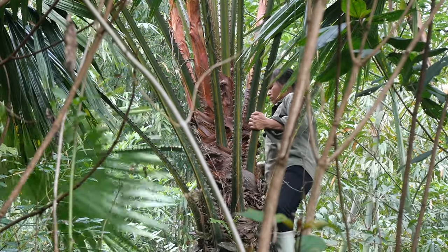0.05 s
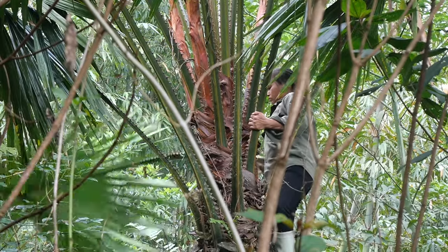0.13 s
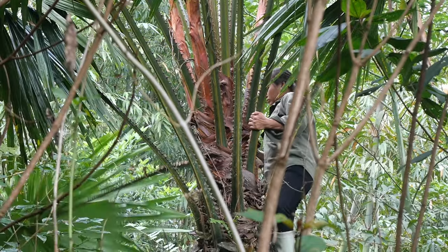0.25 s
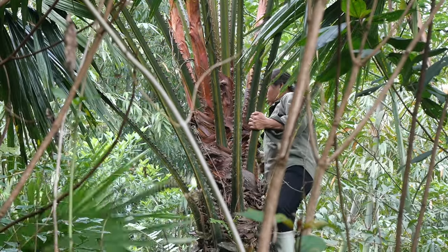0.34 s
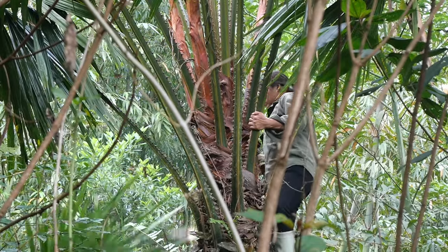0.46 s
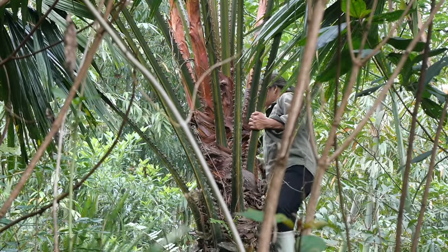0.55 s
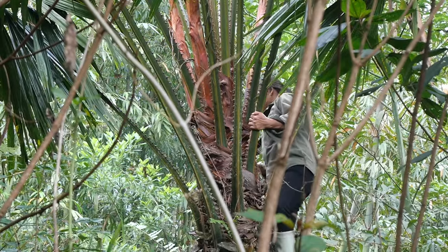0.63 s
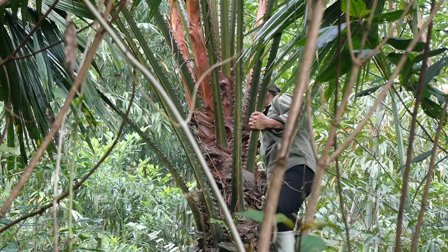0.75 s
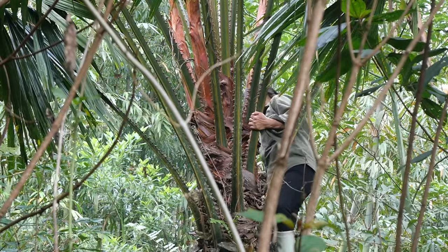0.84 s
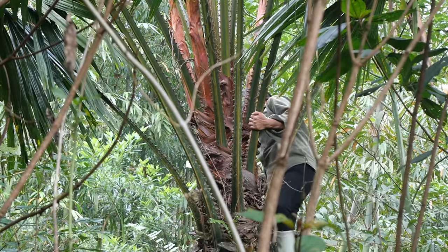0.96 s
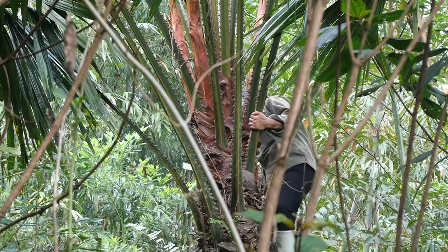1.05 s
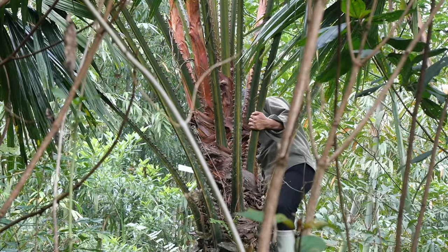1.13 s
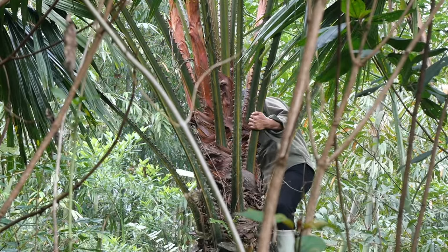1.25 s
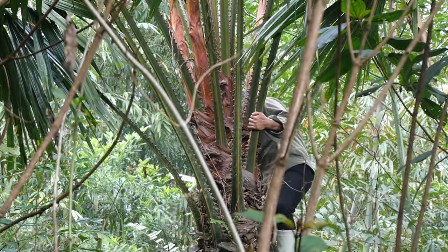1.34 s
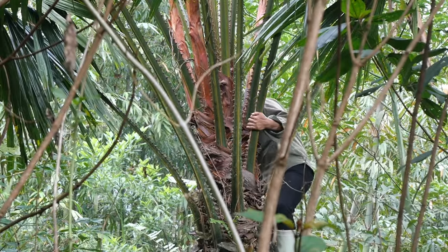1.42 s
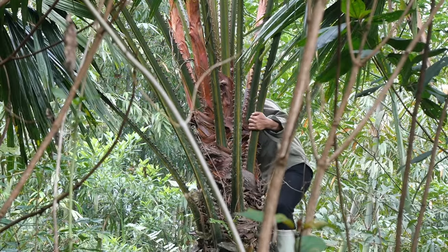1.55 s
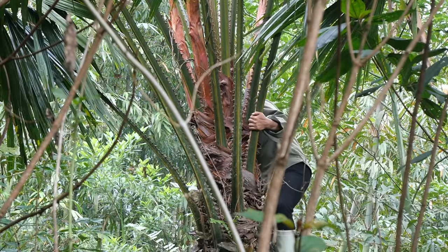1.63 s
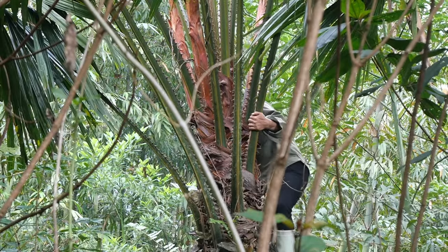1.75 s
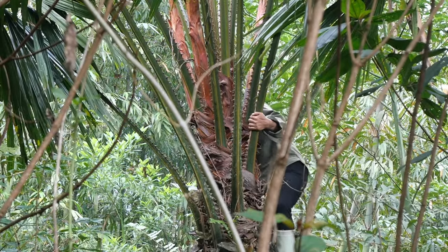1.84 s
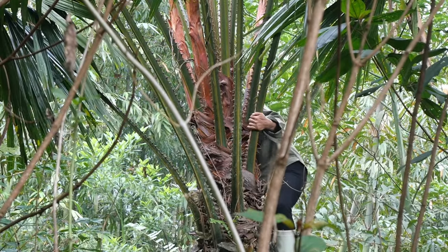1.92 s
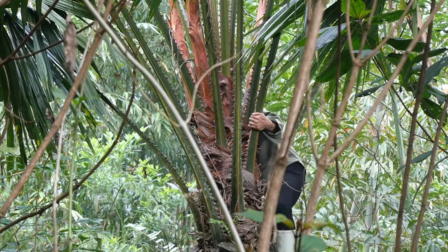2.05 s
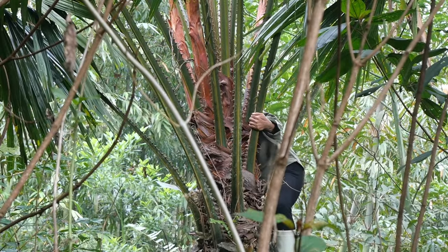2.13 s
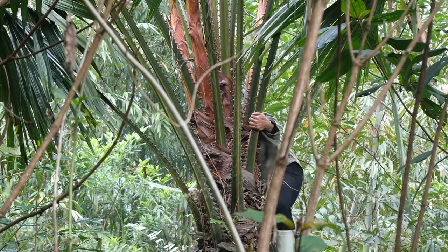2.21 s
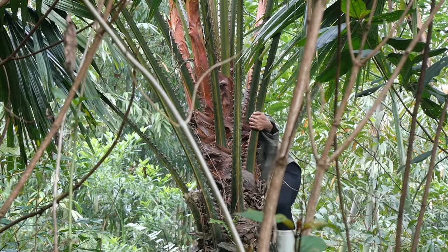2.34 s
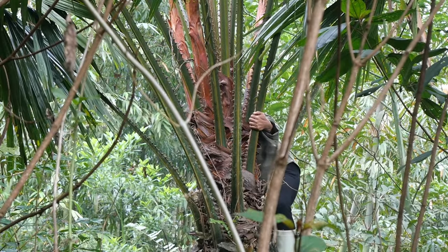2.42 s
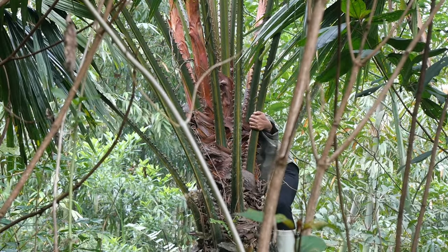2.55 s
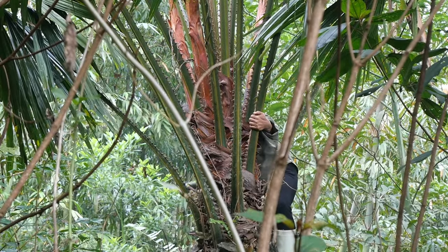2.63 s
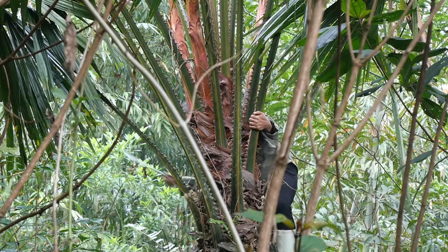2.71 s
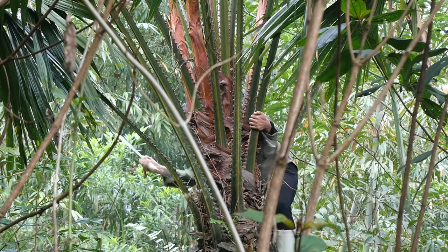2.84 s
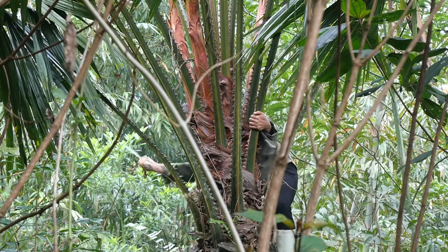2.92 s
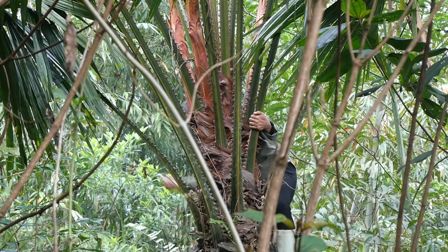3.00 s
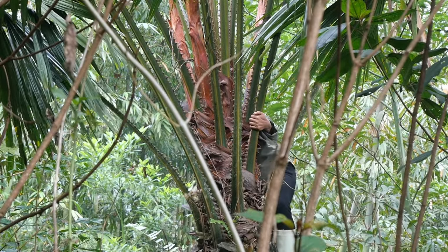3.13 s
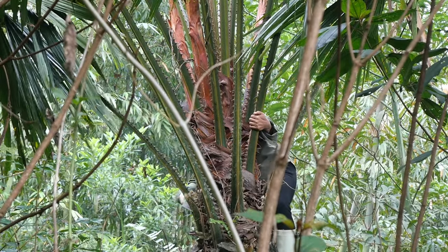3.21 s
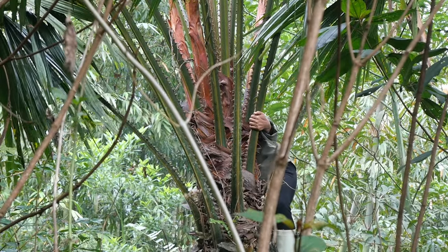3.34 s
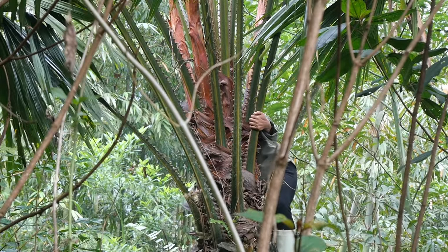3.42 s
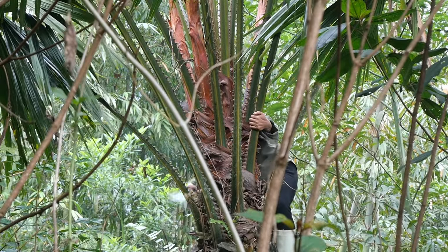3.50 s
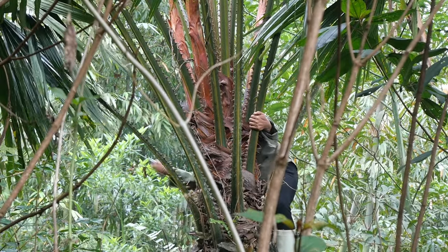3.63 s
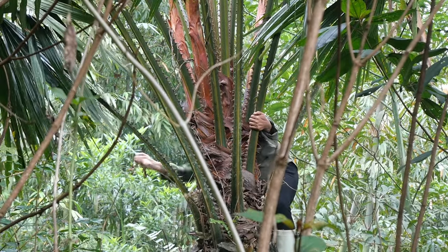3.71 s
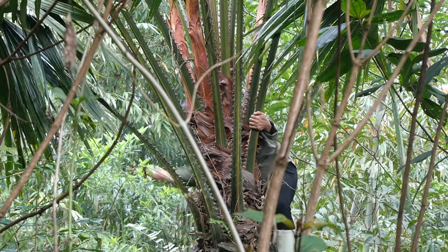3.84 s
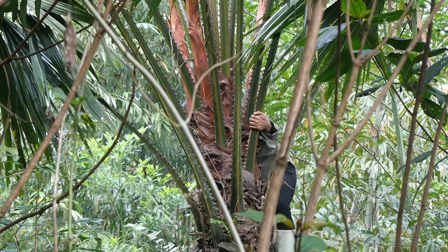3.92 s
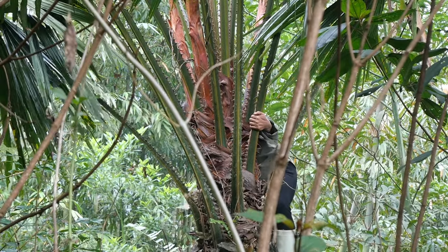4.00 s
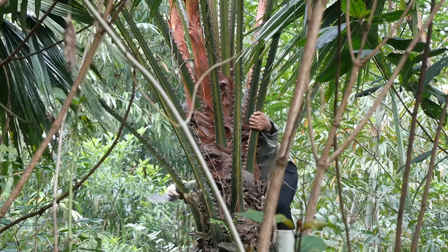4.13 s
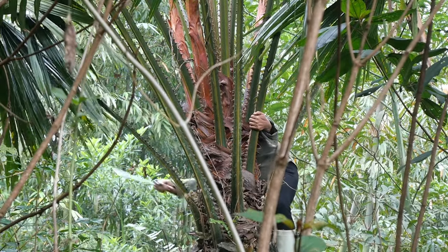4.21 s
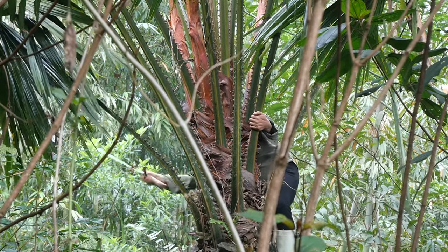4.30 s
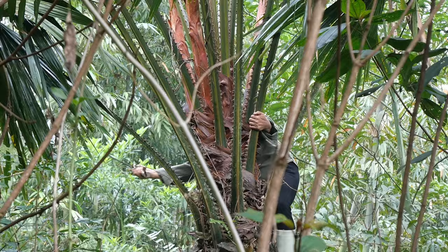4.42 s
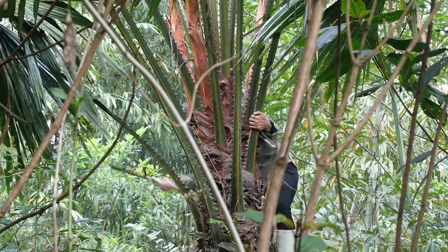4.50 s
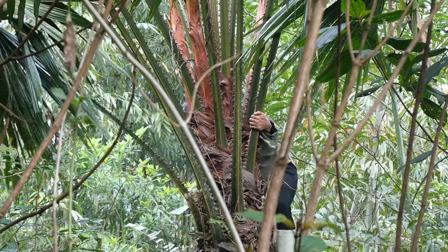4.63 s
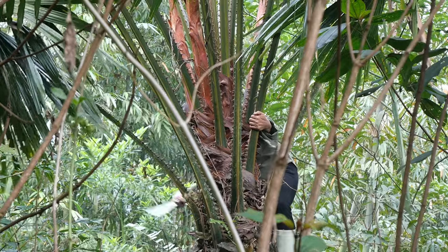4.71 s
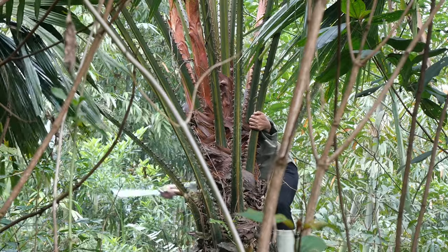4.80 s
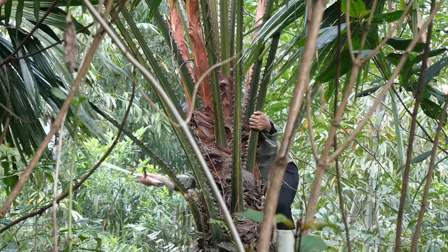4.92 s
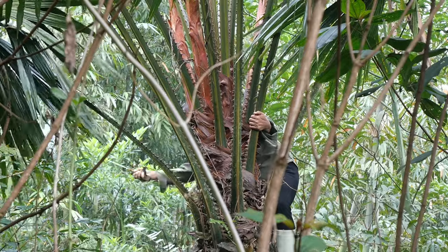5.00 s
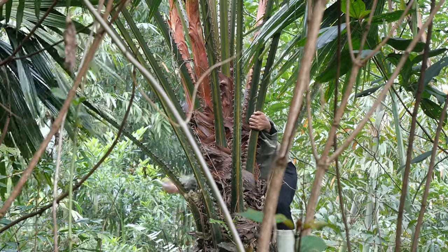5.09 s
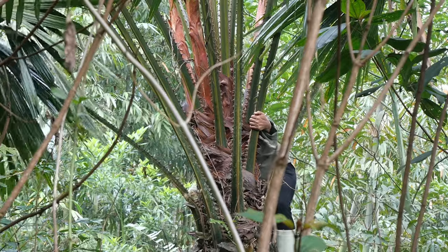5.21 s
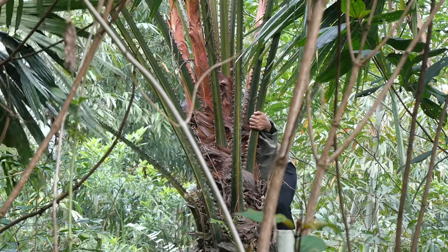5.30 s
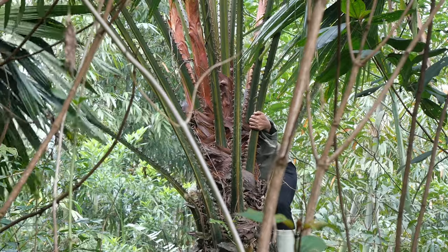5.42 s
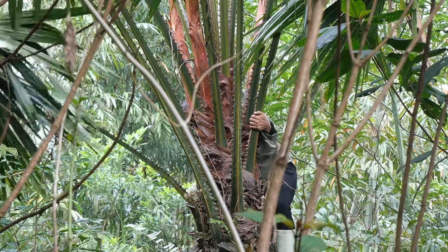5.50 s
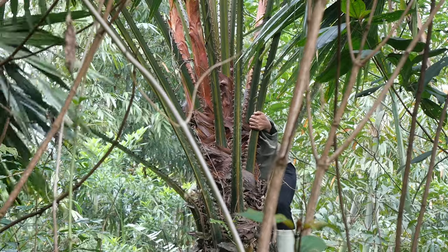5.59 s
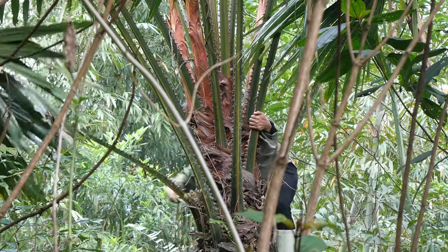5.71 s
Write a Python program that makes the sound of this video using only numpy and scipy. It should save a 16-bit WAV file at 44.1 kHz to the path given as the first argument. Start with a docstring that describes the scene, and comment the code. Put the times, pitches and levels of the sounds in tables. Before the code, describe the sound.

A machete chops hollow-sounding palm stalks in a forest, a frond tears loose and rustles down, then sharper blows follow about every 0.6 to 0.9 seconds.

```python
"""In a forest, some metres away, a machete chops at the frond stalks of a palm, and one frond is pulled loose.
Each blow, and the pull, is a run of fibre impulses with a crack, a clink, a hollow knock and a faint thud.
Bounces off nearby stalks and decaying random reflections scatter the wood sounds back.
Fronds move with swishing, crackling and ticking noise, over faint forest air and insect bands.
A far bird calls in gliding sines with an echo."""
import sys
import numpy as np
from scipy import signal
from scipy.fft import rfft, irfft
from scipy.io import wavfile
from scipy.ndimage import uniform_filter1d

SR = 44100
rng = np.random.default_rng(int(sys.argv[2]) if len(sys.argv) > 2 else 0)


def transcribe(u):
    """Save the signal u as a 16-bit wav file named by the first command-line argument.

    u: samples, shape (n,) or (channels, n), limited to [-1, 1]; the rate is SR.
    q: integer samples, one column per channel.
    """
    v = np.clip(np.atleast_2d(u).T, -1, 1)
    q = np.round(v * 32767).astype(np.int16)
    wavfile.write(sys.argv[1], SR, q)


N = 253575
T = np.arange(SR) / SR  # one second of time, s

# Blows of the blade, and a tearing crack as a frond is pulled loose (1.022), each followed by a split.
# Each row: start in seconds, knock level in dB,
# stalk pitch in Hz, knock brightness in dB per octave, hollowness in dB, crack level in dB,
# crack centre in Hz, thud level in dB, length of the breaking (for a blow, the bite) in seconds,
# scattered level in dB before BREAK_SCATTER_DB is added, delay of the split in seconds,
# split level in dB, split pitch in Hz.
BLOWS_AND_PULL = [(0.0447, -34, 840, 4, -11, -38.5, 2200, -67.5, 0.0086, -10.5, .014, -36.5, 430),
                  (1.022, -33, 840, -1.5, 3, -27.5, 7000, -66, 0.027, -5, .015, -35, 620),
                  (2.541, -32, 848, -0.1, 3, -50, 4500, -75, 0.0037, -9, 0.024, -43.5, 502),
                  (3.1842, -28, 800, 1, -3, -34, 4100, -66.5, 0.0051, -1.5, .009, -29.5, 580),
                  (4.0391, -25, 846, 0.4, -2.5, -29.5, 2970, -65.5, 0.0029, -1.5, .034, -30, 570),
                  (4.6816, -26.5, 760, 1.5, -1, -27.5, 4350, -70, 0.0051, -3, 0.035, -28, 624),
                  (5.2826, -29.5, 770, -1, 0, -31, 3670, -66, 0.0051, -5.5, .001, -34, 470)]
BREAK_SCATTER_DB = 4.5
STEEL_DB = -8.5  # clink, relative to the crack
SPLIT_S, SPLIT_HOLLOW_DB, SPLIT_TILT_DB = 0.012, 2, 1.5  # length, hollowness, brightness in dB per octave


def blows_and_pull():
    """Transient excitation: a blow or a pull sounds as crack, clink, knock and thud, then a split."""
    mix = np.zeros((2, N))
    for (s, knock_db, pitch_hz, tilt_db, hollow_db, crack_db, crack_hz, thud_db,
         break_s, scatter_db, delay_s, split_db, split_hz) in BLOWS_AND_PULL:
        wet_db = scatter_db + BREAK_SCATTER_DB
        breaking = crack(crack_db, crack_hz, ring_db=7.0, length_s=break_s, wet_db=wet_db, octaves=1.0)
        add(mix, s, panned(breaking, left_db=0.5))
        add(mix, s, steel(crack_db + STEEL_DB))
        add(mix, s + 0.00047, knock(knock_db, pitch_hz, break_s, hollow_db, wet_db, tilt_db))
        add(mix, s + 0.006, thud(thud_db, 2 * break_s))
        split = knock(split_db, split_hz, SPLIT_S, SPLIT_HOLLOW_DB, wet_db=-1.0, tilt_db=SPLIT_TILT_DB)
        add(mix, s + delay_s, split)
    return mix


# Dull knocks of stalks that bend or bump. Each row: start in seconds, level in dB, pitch in Hz,
# length in seconds.
BUMPS = [(.42, -61.5, 820, .007), (.737, -62, 885, 0.0066), (0.911, -57.5, 870, 0.0055),
         (1.09, -38, 687, 0.019), (1.595, -50, 1030, 0.0055), (1.908, -52, 870, 0.0025),
         (3.586, -56, 610, 0.019), (5.333, -38.5, 663, 0.032), (5.515, -55.5, 635, 0.015),
         (5.643, -52, 630, 0.044)]


def bumping_stalks():
    """Modal response to a weak push: stalks that bend or bump ring without a crack."""
    mix = np.zeros((2, N))
    for s, db, pitch_hz, length_s in BUMPS:
        add(mix, s, knock(db, pitch_hz, length_s, hollow_db=0.0, wet_db=-2.5))
    return mix


# Fibres that snap or creak, and the lower part of the first blow's crack (0.042).
# Each row: start in seconds, level of left over right in dB, level in dB,
# centre in Hz, resonance height in dB, length in seconds, scattered level in dB.
BREAKING_FIBRES = [(0.041, 0, -44, 4390, 14, 0.0051, 3), (0.042, 0, -38.5, 1980, 10, 0.0044, 13),
                   (0.256, -4, -60, 1370, 40, .029, -8), (0.402, 1, -61, 12500, 3, .01, 0),
                   (1.011, 2, -41.5, 4520, -2, 0.0075, 1), (1.026, 9, -32, 7000, 26, 0.0044, -3.5),
                   (1.198, -0.5, -38, 3500, 5, 0.0031, 3), (1.5867, 4, -36, 5700, 16, 0.0031, 3.5),
                   (2.174, -1, -53.5, 3950, 13, 0.0011, -19), (2.5157, -2.5, -47.5, 4230, 3, .0012, 12),
                   (2.663, 0, -51, 3780, 13.5, 0.041, 0), (2.762, 2, -57, 3700, 18, .008, -1),
                   (2.932, -2, -47, 1760, 20.5, 0.025, -6.5), (2.946, 1.5, -47.5, 2400, 10.5, 0.026, 0),
                   (3.5198, 1, -37, 3500, 1, 0.0048, 2.5), (5.276, 0, -44, 2980, -2, 0.006, -22),
                   (5.503, 4, -56, 3800, 17, 0.022, -9), (5.644, -6, -56.5, 3470, 23, 0.0028, -10)]


def breaking_fibres():
    """Sudden release of strain: fibres snap or creak, and the first blow's crack gets its lower part."""
    mix = np.zeros((2, N))
    for s, left_db, db, centre_hz, ring_db, length_s, wet_db in BREAKING_FIBRES:
        add(mix, s, panned(crack(db, centre_hz, ring_db, length_s, wet_db), left_db))
    return mix


# Spectrum of breaking wood fibres. Each row: frequency in Hz, relative gain in dB.
CRACK_SPECTRUM = [(20, -13), (150, -23.5), (400, -9), (1200, -2.5), (2000, -7.5), (3200, 2.5), (5500, -0.5),
                  (8000, -2.5), (11000, -4.5), (15500, -5)]


def crack(db, centre_hz, ring_db, length_s, wet_db, octaves=0.23):
    """Broadband fracture: breaking fibres, with a resonance of the piece that breaks."""
    hz = bins(SR)
    peak = np.exp(-0.5 * (np.log2((hz + 1) / centre_hz) / octaves) ** 2)
    tone_db = read(CRACK_SPECTRUM, hz) + ring_db * peak
    return heard(fibres(length_s), tone_db, db, wet_db)


# Modes of the steel blade, damped by the hand and the wood. Each row: frequency in Hz,
# mean relative level in dB, time to decay by 60 dB in seconds.
STEEL_MODES = [(2480, 4, 0.031), (3180, -17, 0.052), (3630, 9, 0.067), (4590, -3.5, 0.06), (5120, 6, 0.052),
               (6490, -10, .07), (7440, -22.5, 0.023), (7790, -14, 0.049)]


def steel(db, uneven_db=8):
    """Modal ringing of a steel blade: each mode's strength is drawn anew, as where the edge lands decides it."""
    hz, level, t60 = np.transpose(STEEL_MODES)[:, :, None]
    level = level + uneven_db * rng.standard_normal(hz.shape)
    # phases in turns, nearly alike in both channels
    turns = rng.random(hz.shape) + 0.04 * rng.standard_normal((2, len(STEEL_MODES), 1))
    modes = amp(level - 60 * T / t60) * np.sin(2 * np.pi * (hz * T + turns))
    ring = modes.sum(1) * (1 - np.exp(-T / 0.00033))  # short attack
    return amp(db) * ring / onset_rms(ring)


# Modes of a green stalk. Each row: multiple of its pitch, relative level in dB, half-power width in Hz.
STALK_MODES = [(.25, -13, 60), (.46, -2.5, 86), (0.699, 2.5, 91), (1.004, 9, 116), (1.3, -5, 136),
               (1.55, -6, 160), (2.1, -26, 220)]
# Spectrum of the wood around those modes. Each row: frequency in Hz, relative gain in dB.
WOOD_SPECTRUM = [(20, -53), (100, -41), (160, -15), (220, -9), (320, -2), (1200, 4), (2200, 3.5), (5000, 0),
                 (16000, -31)]


def knock(db, pitch_hz, length_s, hollow_db, wet_db, tilt_db=0, push=0.66):
    """Damped resonance: a push and tearing fibres ring the stalk's modes; hollowness lifts the main one."""
    hz = bins(SR)
    power = sum(amp(level) ** 2 / (1 + (2 * (hz - multiple * pitch_hz) / width_hz) ** 2)
                for multiple, level, width_hz in STALK_MODES)
    main_db = hollow_db * np.exp(-((hz - pitch_hz) / 85) ** 2)
    slope_db = tilt_db * np.log2(np.maximum(hz, 150) / pitch_hz)
    tone_db = 10 * np.log10(power) + main_db + read(WOOD_SPECTRUM, hz) + slope_db
    force = fibres(length_s, push * np.exp(-length_s / 0.037))  # a slow bend has no sharp push
    return heard(force, tone_db, db, wet_db)


def thud(db, length_s, corner_hz=120):
    """Low-frequency momentum transfer: a blunt shove against the trunk."""
    hz = bins(SR) + 1
    tone_db = 20 * np.log10(hz / (hz + 20) / (1 + (hz / corner_hz) ** 3))
    return heard(fibres(length_s, 0.98), tone_db, db, wet_db=-14.0, deep_db=-29)


def fibres(length_s, first=0.22):
    """Progressive fracture: one fibre gives way at once, then a run of others swells and ends."""
    u = T / max(length_s, 0.001)
    run = clicks(SR, 9000, 4.2)[0] * (0.16 + u) * np.exp(-1.6 * u * u)
    run /= np.linalg.norm(run) + 1e-12
    run[0] += first
    return run / np.linalg.norm(run)


# Decay of the scatter from near foliage. Each row: frequency in Hz, time to decay by 60 dB in seconds.
THICKET_DECAY = [(60, 0.059), (200, 0.22), (600, 0.17), (1500, 0.24), (4000, .27), (9000, 0.31),
                 (15000, 0.33)]
# Decay of the echo of the deeper forest. Each row: frequency in Hz, time to decay by 60 dB in seconds.
DEEP_DECAY = [(60, 0.13), (300, 0.52), (800, 0.54), (3000, 0.86), (6000, 0.7), (15000, 0.097)]


def heard(force, tone_db, db, wet_db, deep_db=-20, ground_hz=330):
    """Multipath propagation: direct sound, thicket and deep forest; db is the rms of the first 40 ms."""
    ground = signal.butter(1, ground_hz, "high", fs=SR, output="sos")
    direct = signal.sosfilt(ground, force)  # the path along the ground loses bass
    paths = 0.62 * off_trunks(direct)
    paths = paths + amp(wet_db) * scatter(force, THICKET_DECAY, 0.0079)
    paths = paths + amp(deep_db) * scatter(force, DEEP_DECAY, 0.17)
    sound = colour(paths, tone_db)
    return amp(db) * sound / onset_rms(sound)


def off_trunks(force, within_s=0.007, height=0.29, count=6):
    """Specular reflection: direct sound and distinct bounces off the nearest stalks, each from its own side."""
    delay, side = rng.random((2, count, 1))
    sign = rng.choice([-1, 1], (count, 1))
    hz = bins(SR // 4)
    # opposite time shifts at the two microphones, s
    ports = np.array([-1, 1])[:, None, None] * (side - 0.5) * 0.000095
    arrival_s = 0.000707 + within_s * delay + ports
    bounces = (sign * np.exp(-2j * np.pi * hz * arrival_s)).sum(1)
    near = irfft(rfft(force[:SR // 4]) * (1 + height * bounces), SR // 4)
    return np.pad(near, ((0, 0), (0, SR - SR // 4)))


def scatter(force, t60s, build_s):
    """Diffuse reverberation: countless reflections fed by a force; each band dies at its own speed."""
    hz, t, z = signal.stft(clicks(SR, 9000, 2.5), SR, nperseg=256)
    decay = amp(-60 * t / read(t60s, hz)[:, None])
    tail = signal.istft(z * decay, SR, nperseg=256)[1][:, :SR]
    # later force is weighted up, to offset the decay already in the tail
    offset = amp(120 * np.minimum(T / read(t60s, 1000), 1))
    r = np.exp(-1 / (build_s * SR))
    fed = signal.lfilter([1 - r], [1, -r], np.cumsum(force ** 2 * offset))
    return unit(surround(tail * np.sqrt(fed))) / np.sqrt(SR)


# Moves of a frond that is set moving, slides and settles. Each row: start in seconds,
# time to gather speed in seconds, slide in seconds, settling time of the fan in seconds,
# swish of the fan in dB before SWISH_DB is added, crackle of leaflets in dB before CRACKLE_DB is added.
FROND_MOVES = [(0, 0.008, .28, 0.061, -55, -59.5), (.8, .07, .01, 0.013, -78, -63),
               (1.02, 0.084, .02, 0.38, -41, -46), (1.58, 0.16, .95, 0.24, -47.5, -56),
               (2.97, .07, .03, 0.056, -66, -56), (4.88, 0.073, .06, 0.071, -71, -62.5),
               (5.4, 0.05, .27, .1, -66, -61)]
# Spectrum of the broad fans. Each row: frequency in Hz, relative gain in dB.
SWISH_SPECTRUM = [(20, -69), (140, -37), (280, -18.5), (500, -4), (900, 4), (1200, 0.5), (1700, -7),
                  (3000, -7.5), (8000, -26)]
# Spectrum of the dry leaflets. Each row: frequency in Hz, relative gain in dB.
LEAF_SPECTRUM = [(200, -64), (1000, -9), (2000, -11), (3600, -4), (5500, -6.5), (8000, -10), (12000, -10.5),
                 (15500, -20)]
# Spectrum of leaflet tips that catch and let go. Each row: frequency in Hz, relative gain in dB.
TIP_SPECTRUM = [(200, -41), (1000, -14), (2400, -5), (3700, -5.5), (5200, -16), (12000, -19.5),
                (15500, -20)]
SWISH_DB, CRACKLE_DB = -1.0, 3.0
SWISH_SAG_DB_PER_S, CRACKLE_SAG_DB_PER_S = 10.5, -1.2  # the swish fades in a slide, the crackle grows a little
FLUTTER = 1.18  # leaflets take this many times longer to settle than the fan
TICKS_PER_S, TICKS_DB = 110, -12  # level relative to the crackle


def fronds():
    """Friction noise: fans swish, leaflets crackle and tick while a frond moves; faint crackle is duller."""
    swish = rubbing(SWISH_SPECTRUM, 3000, 2.2, clump_db=0.9)
    crackle = rubbing(LEAF_SPECTRUM, 5000, 3, clump_db=1)
    gentle = rubbing(LEAF_SPECTRUM, 6000, 2.5, clump_db=0.8)
    soft = signal.sosfilt(signal.butter(2, 5500, fs=SR, output="sos"), gentle)
    ticks = rubbing(TIP_SPECTRUM, TICKS_PER_S, 4.8, clump_db=1)
    t, fan, leaf = np.arange(N) / SR, np.zeros(N), np.zeros(N)
    for s, rise_s, slide_s, settle_s, swish_db, crackle_db in FROND_MOVES:
        fan_motion = motion(t - s, rise_s, slide_s, settle_s, SWISH_SAG_DB_PER_S)
        leaf_motion = motion(t - s, rise_s, slide_s, FLUTTER * settle_s, CRACKLE_SAG_DB_PER_S)
        fan = np.hypot(fan, amp(swish_db) * fan_motion)  # separate moves add in power
        leaf = np.hypot(leaf, amp(crackle_db) * leaf_motion)
    brisk = np.clip((20 * np.log10(leaf + 1e-9) + 57) / 12, 0.05, 1)
    leaflets = np.sqrt(brisk) * crackle + 1.08 * np.sqrt(1 - brisk) * soft + amp(TICKS_DB) * ticks
    return fan * amp(SWISH_DB) * swish + leaf * amp(CRACKLE_DB) * leaflets


def motion(age, rise_s, slide_s, settle_s, sag_db_per_s):
    """Friction and damping: the level rises with speed, drifts by the sag and dies away after the slide."""
    moving = np.maximum(age - rise_s, 0)
    settling = np.exp(-np.maximum(moving - slide_s, 0) / settle_s)
    return np.clip(age / rise_s, 0, 1) * amp(-sag_db_per_s * moving) * settling


def rubbing(spectrum, per_s, spread_db, clump_db):
    """Stochastic contact: random grains come in clumps and take on a spectrum."""
    clumps = uniform_filter1d(rng.standard_normal(N), size=700)
    clumps = unit(uniform_filter1d(clumps, size=300))
    grains = surround(clicks(N, per_s, spread_db) * amp(clump_db * clumps))
    return unit(irfft(rfft(grains) * amp(read(spectrum, bins(N))), N))


# Spectrum of the air among leaves. Each row: frequency in Hz, relative gain in dB.
AIR_SPECTRUM = [(15, -84), (25, -69), (134, -39), (317, -18.5), (344, -14), (384, -12), (714, -6.5),
                (1070, -8.5), (1230, -11), (2160, -16.5), (2910, -2.5), (3720, -18), (4490, -4.5),
                (8830, -19), (16000, -20.5)]
AIR_DB = -62


def air():
    """Diffuse ambient noise: still air among leaves."""
    return amp(AIR_DB) * rubbing(AIR_SPECTRUM, 20000, 1, clump_db=0.5)


# Steady bands of far insects. Each row: centre in Hz, width in Hz, level in dB.
INSECT_BANDS = [(3210, 1100, -64), (4950, 200, -85)]


def insects():
    """Band-limited noise: far insects give a steady hiss in each band."""
    mix = np.zeros((2, N))
    for hz, width_hz, db in INSECT_BANDS:
        band = np.exp(-2 * ((bins(N) - hz) / width_hz) ** 2)
        noise = surround(rng.standard_normal((2, N)))
        mix += amp(db) * unit(irfft(rfft(noise) * band, N))
    return mix


# Calls of a far bird. Each row: start in seconds, level in dB before the direct and echo gains.
BIRD_CALLS = [(.471, -58), (.781, -60), (3.65, -59), (3.979, -58)]
# Notes of a call, a falling whistle and a small upward flick. Each row: delay in seconds,
# level relative to the call in dB, first frequency in Hz, last frequency in Hz, length in seconds.
CALL_NOTES = [(0, 0, 5400, 3250, .056), (.078, -6, 3400, 4300, .03)]
WHISTLE_DIRECT, WHISTLE_ECHO = 0.8, 1.7  # gains


def bird():
    """Frequency modulation and reverberation: quick gliding whistles and their echo among the trees."""
    mix = np.zeros((2, N))
    for s, db in BIRD_CALLS:
        for delay_s, note_db, first_hz, last_hz, length_s in CALL_NOTES:
            u = np.minimum(T / length_s, 1)
            glide_hz = first_hz * (last_hz / first_hz) ** u
            tone = np.sin(2 * np.pi * np.cumsum(glide_hz) / SR)
            whistle = amp(db + note_db) * np.sin(np.pi * u) * tone
            trees = scatter(signal.unit_impulse(SR), THICKET_DECAY, 0.013)
            echo = signal.fftconvolve(whistle[None], trees, axes=1)[:, :SR]
            add(mix, s + delay_s, WHISTLE_DIRECT * whistle + WHISTLE_ECHO * echo)
    return mix


# Likeness of the two channels for sound from all sides. Each row: frequency in Hz, coherence from 0 to 1.
COHERENCE = [(30, 0.53), (300, 0.82), (800, 0.83), (1500, 0.8), (3000, 0.091), (6000, .05), (15000, .02)]


def surround(pair, lead_s=0.00004):
    """Diffuse-field coherence: two signals become alike in the bass, slightly earlier on the left."""
    a, b = rfft(pair)
    hz = bins(pair.shape[1])
    c = np.clip(read(COHERENCE, hz), 0, 1)
    right = (c * a + np.sqrt(1 - c * c) * b) * np.exp(-2j * np.pi * hz * lead_s)
    return irfft(np.array([a, right]), pair.shape[1])


def clicks(size, per_s, spread_db):
    """Random impulse process: two trains of clicks, a few much larger than the rest."""
    heights = amp(spread_db * np.minimum(rng.exponential(1, (2, size)), 4))
    heights = heights * rng.choice([-1, 1], (2, size))
    return unit(heights * (rng.random((2, size)) < per_s / SR))


def colour(x, db):
    """Minimum-phase filtering: the folded cepstrum gives a causal filter with the given gain in every bin."""
    size = x.shape[-1]
    cepstrum = irfft(np.log(amp(db)), size)
    cepstrum[1:size // 2] *= 2
    cepstrum[size // 2 + 1:] = 0
    return irfft(rfft(x) * np.exp(rfft(cepstrum)), size)


def panned(x, left_db):
    """Level difference between channels: shifts a stereo sound towards the left."""
    return x * amp([[left_db / 2], [-left_db / 2]])


def amp(db):
    """Logarithmic level: decibels to gain."""
    return 10 ** (np.asarray(db) / 20)


def unit(x):
    """Power normalisation: scales to rms 1."""
    return x / np.sqrt(np.mean(x ** 2) + 1e-30)


def onset_rms(x):
    """Short-time level: rms of the first 40 ms over both channels."""
    return np.sqrt(np.mean(x[:, :SR // 25] ** 2))


def read(points, hz):
    """Logarithmic interpolation: reads a table along a logarithmic frequency axis."""
    f, value = np.transpose(points)
    return np.interp(np.log(hz + 1), np.log(f + 1), value)


def bins(size):
    """Fourier analysis: frequencies of a spectrum in Hz."""
    return np.fft.rfftfreq(size, 1 / SR)


def add(mix, s, sound):
    """Superposition: lays a stereo sound into the mix at time s."""
    part = mix[:, max(round(s * SR), 0):][:, :sound.shape[1]]
    part += sound[:, :part.shape[1]]


def scene():
    """Superposition of all sources, a little to the left."""
    palm = blows_and_pull() + bumping_stalks() + breaking_fibres() + fronds()
    background = air() + insects() + bird()
    return panned(palm + background, left_db=1.0)


def record(dry):
    """Band limitation: a linear-phase low-pass sets the upper edge of the recorder's band."""
    low_pass = signal.firwin(301, 15800, window=("kaiser", 8), fs=SR)  # edge in Hz
    return signal.oaconvolve(dry, low_pass[None], "same")


dry = scene()
out = record(dry)
transcribe(out)
```